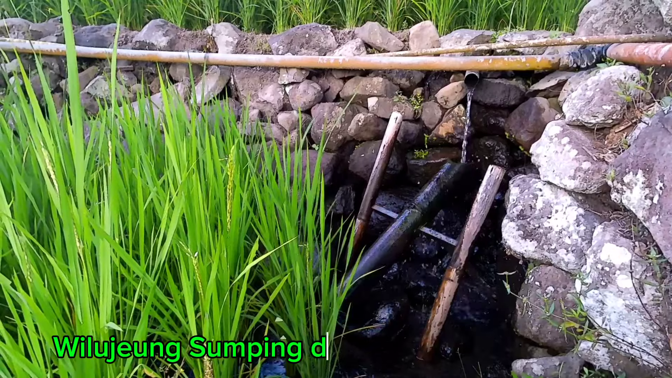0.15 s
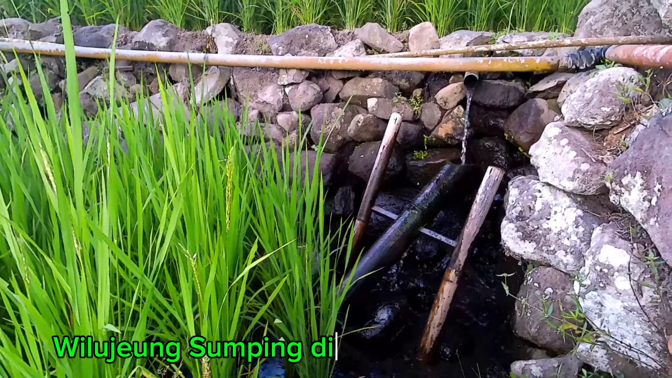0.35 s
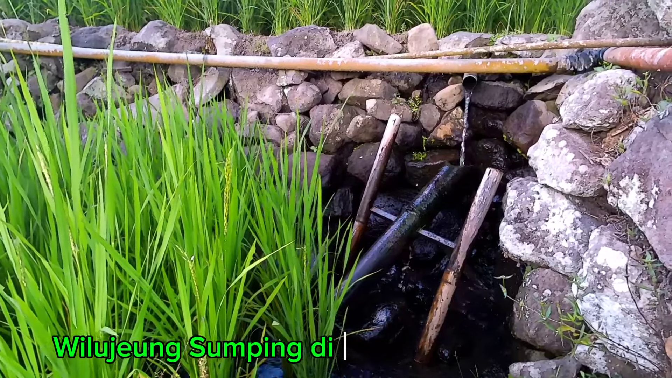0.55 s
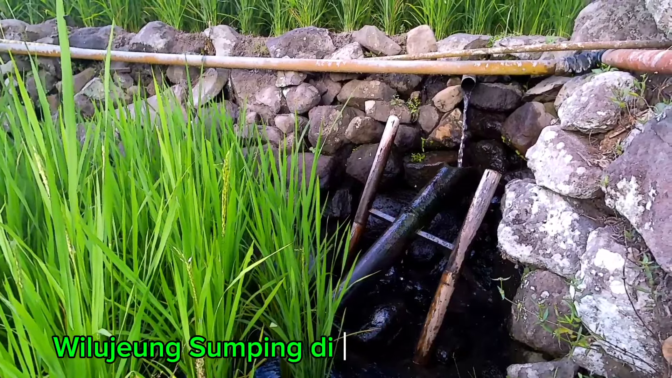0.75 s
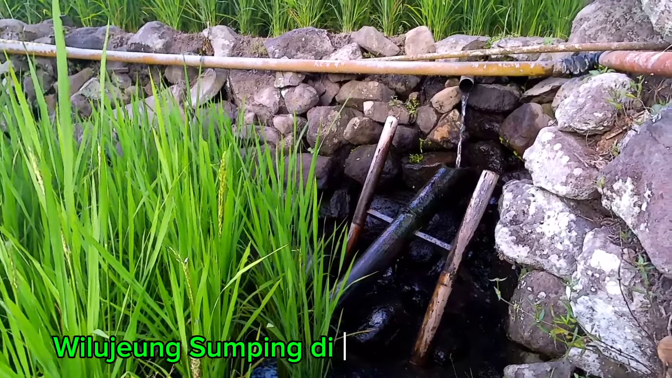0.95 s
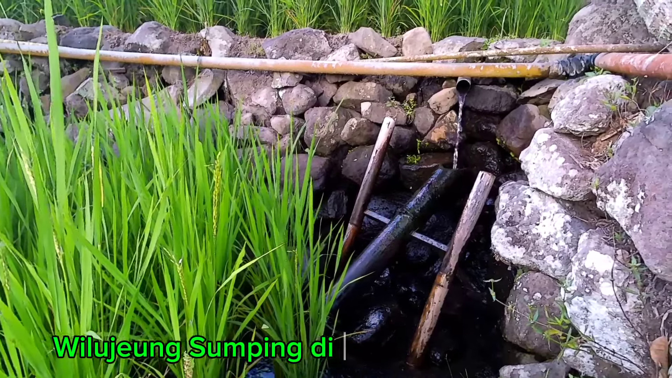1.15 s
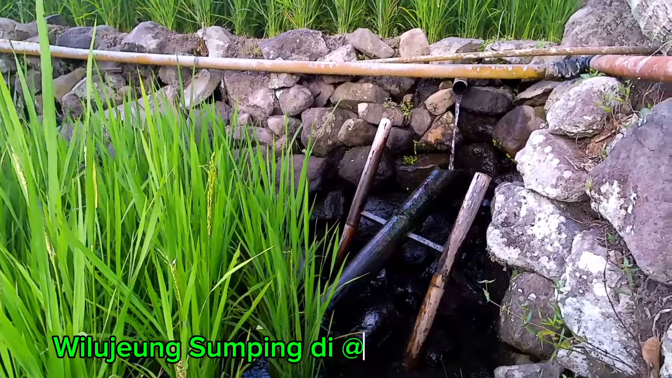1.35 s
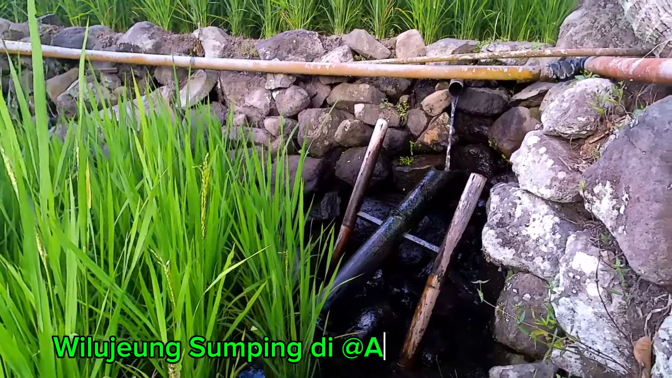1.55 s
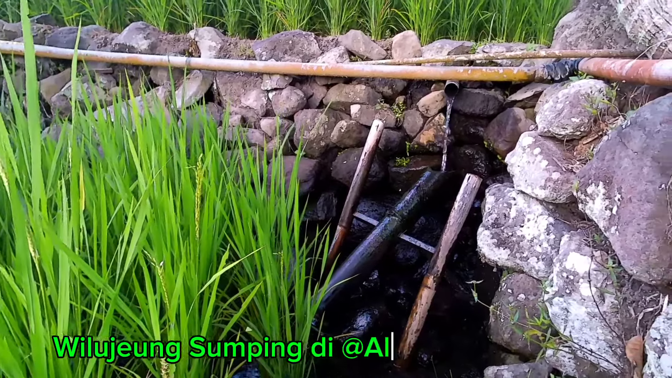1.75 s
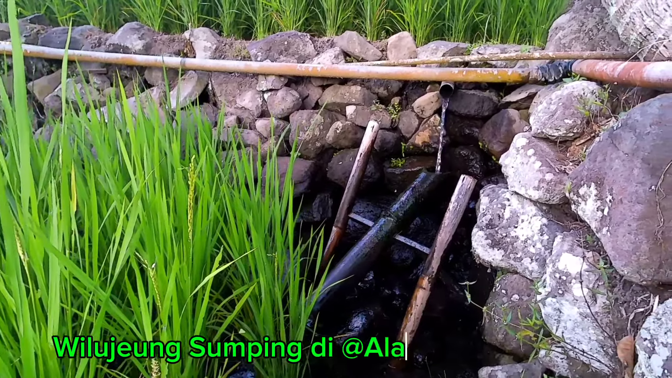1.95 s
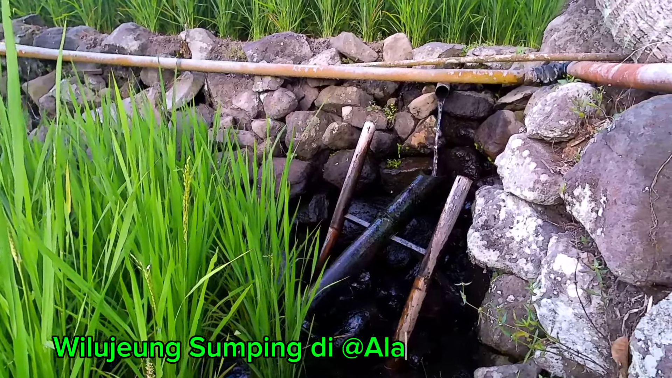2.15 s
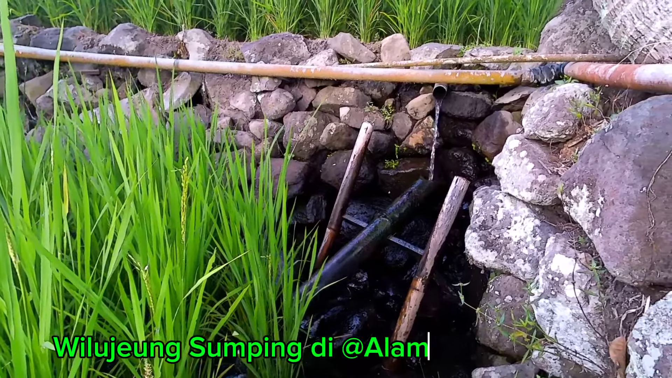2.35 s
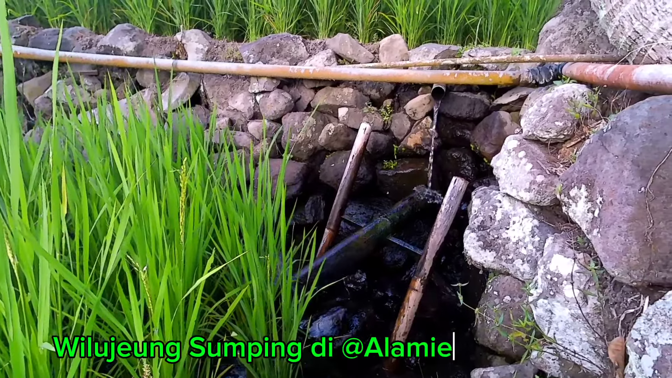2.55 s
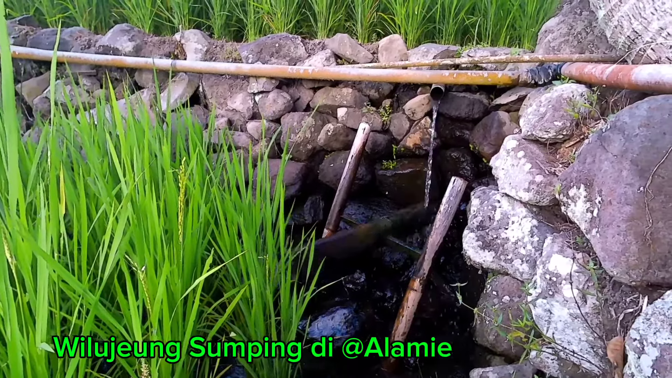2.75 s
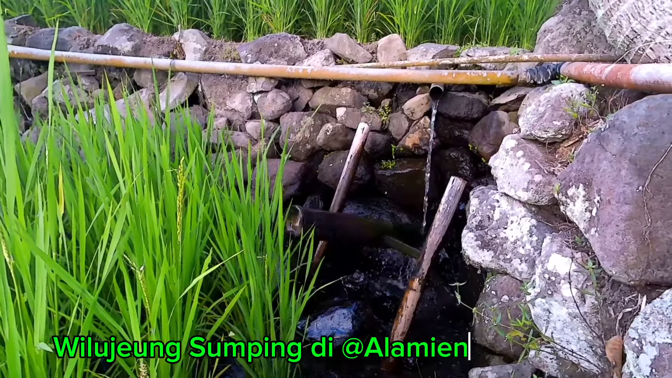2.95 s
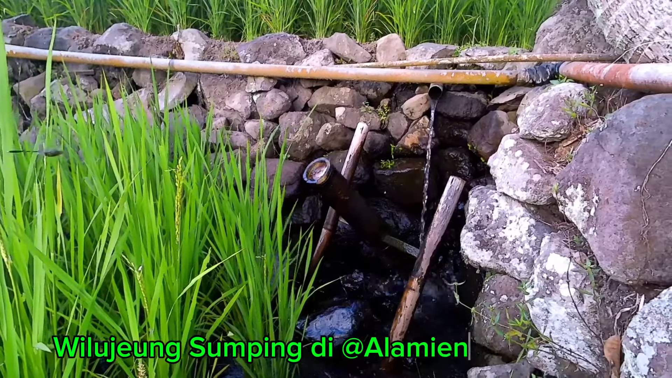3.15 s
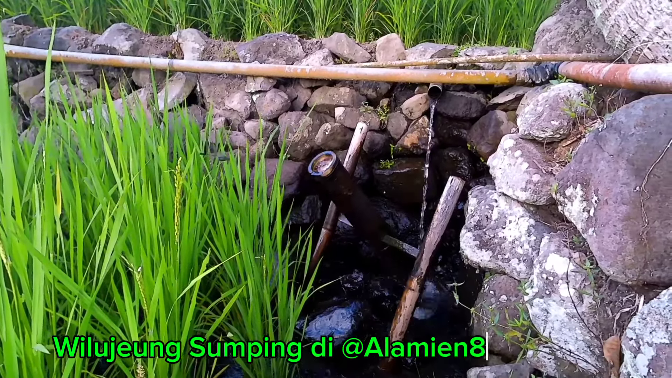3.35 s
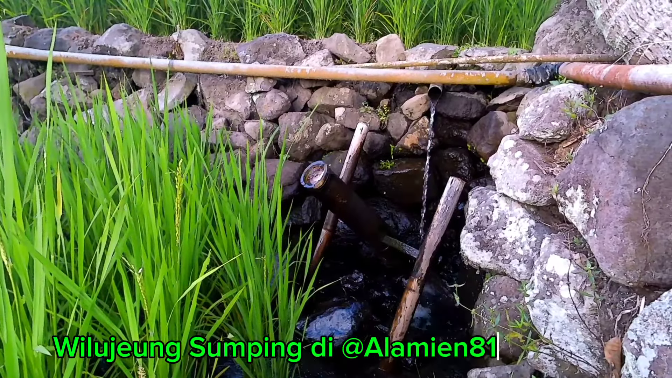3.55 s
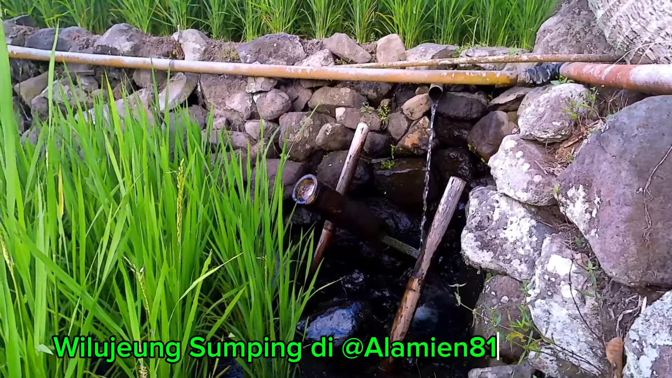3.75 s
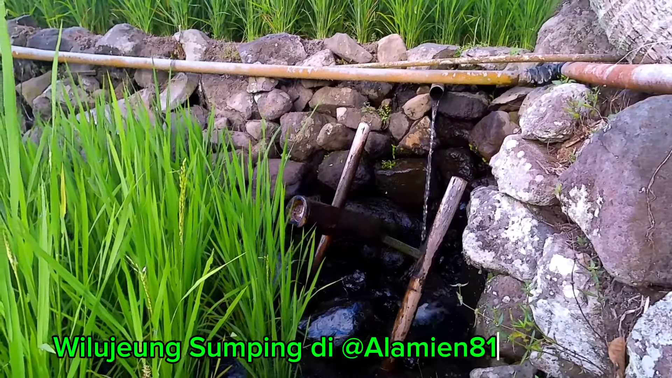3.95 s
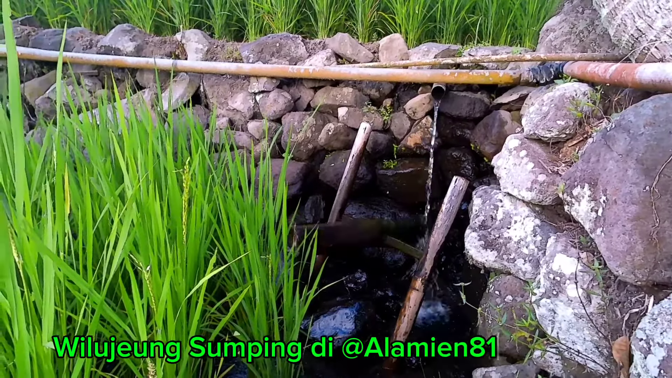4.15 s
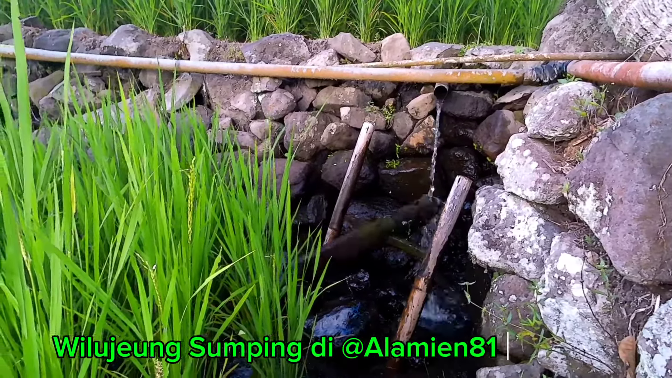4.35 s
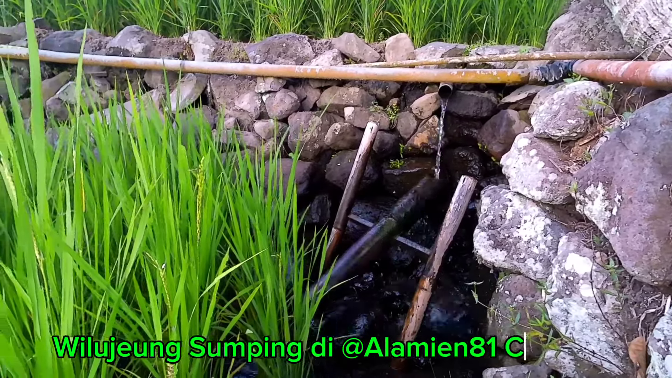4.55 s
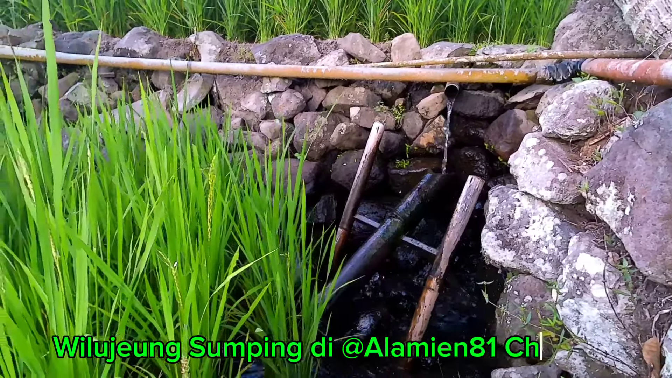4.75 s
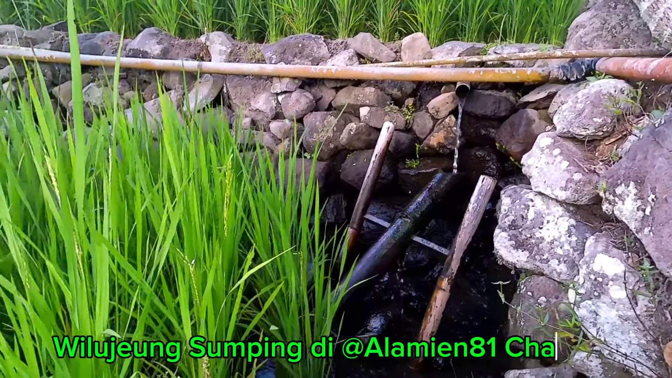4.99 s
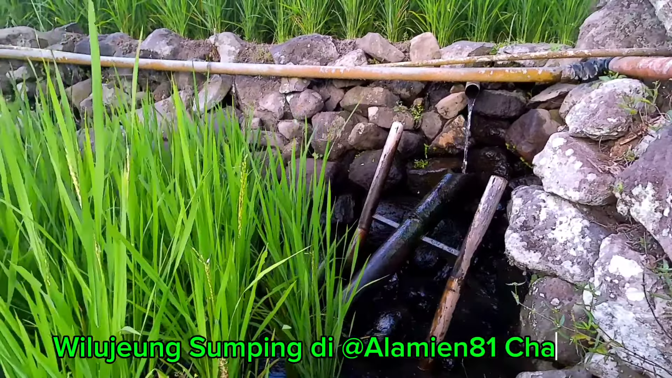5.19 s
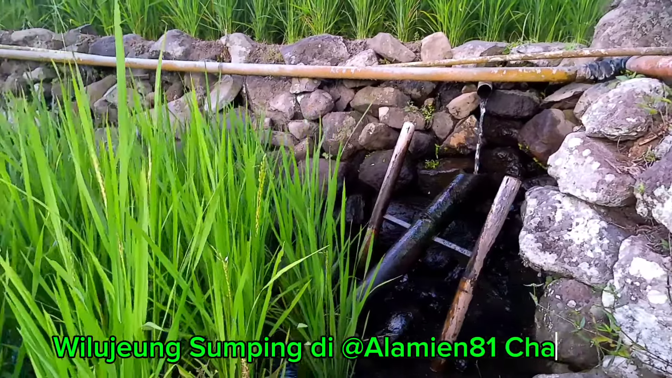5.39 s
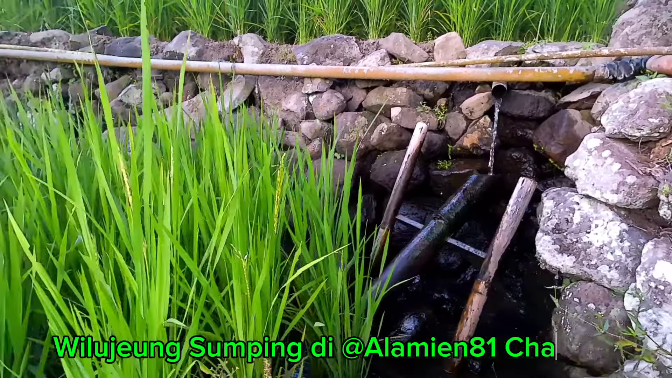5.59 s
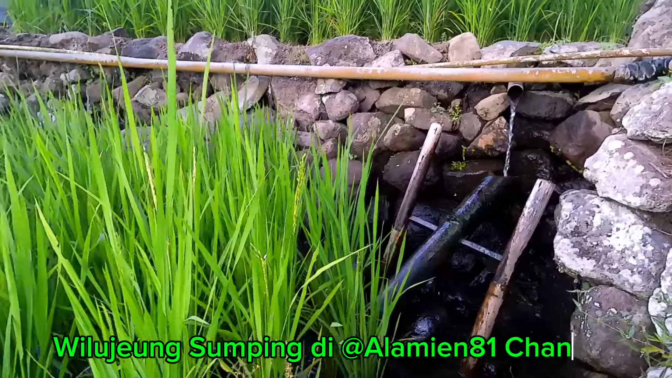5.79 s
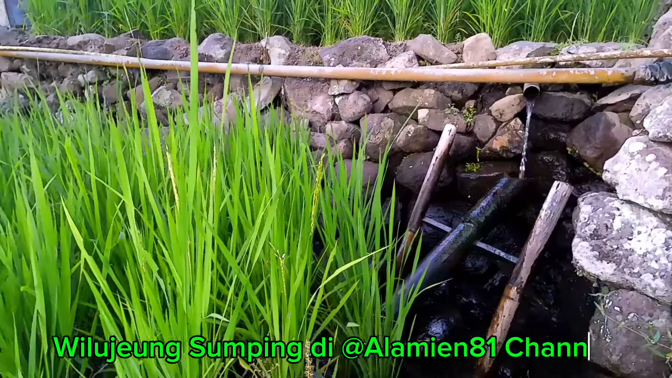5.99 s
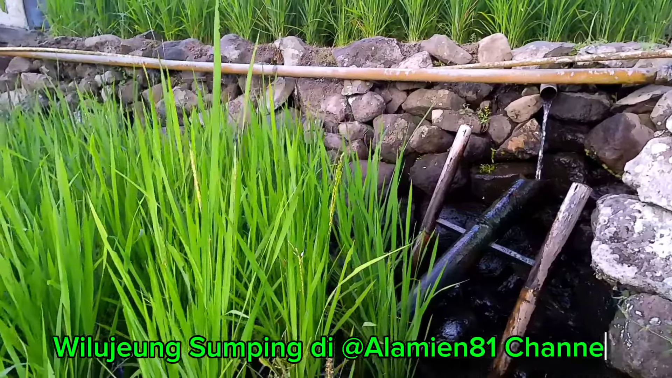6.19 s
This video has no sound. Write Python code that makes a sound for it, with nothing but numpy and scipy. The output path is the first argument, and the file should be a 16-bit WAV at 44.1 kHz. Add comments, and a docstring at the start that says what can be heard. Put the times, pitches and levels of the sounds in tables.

```python
"""A bamboo rocker knocks its closed end on a stone and bounces, in a small stone-walled pool by a rice field.
A thin stream fills the tube; it tips, spills, clacks down on its mouth and swings back to knock again.
Knock and clack are damped modes driven by force pulses, with noise cracks and wall reflections; the knock
is loud enough to overload the microphone. Water trickles and drips throughout as ringing bubbles, over
a faint noise of distant channels."""
import sys
import numpy as np
from scipy import signal
from scipy.io import wavfile

SR = 44100
rng = np.random.default_rng(int(sys.argv[2]) if len(sys.argv) > 2 else 0)


def dump(signal):
    """Clip the signal to [-1, 1] and save it as 16-bit WAV at the path in sys.argv[1]."""
    limited = np.clip(np.atleast_2d(signal).T, -1, 1)
    pcm = np.round(limited * 32767).astype(np.int16)
    wavfile.write(sys.argv[1], SR, pcm)


N = 274743
TIME = np.arange(N) / SR   # s
CUTOFF_HZ = 16290   # upper band limit

# fine spray and droplets on stone: (frequency [Hz], relative density [dB per Hz])
SPRAY_SPECTRUM = [(2500, -6), (3800, 5.5), (5200, -1.5), (6800, -10.5), (9000, -12.5), (10000, -8),
                  (10700, -13)]
# modes of the jolted wooden posts: (frequency [Hz], relative level [dB], t60 [s])
POST_MODES = [(62, -39, .12), (207, -24, .065), (249.1, -27, 0.13), (307, -26.5, 0.025)]
# the closed end falls back on its stone: (time [s], strength [dB])
LANDING_TIMES = [(0.205, 6.5), (4.6655, 6.5)]


def from_db(db):
    """Level to amplitude: 20 dB is a factor of ten."""
    return 10 ** (np.asarray(db) / 20)


def rms_one(x):
    """Normalise the mean power to one."""
    return x / np.sqrt(np.mean(x ** 2) + 1e-20)


def at_hz(points, hz):
    """Interpolate a spectrum in dB along logarithmic frequency."""
    points = np.array(points)
    return np.interp(np.log(hz), np.log(points[:, 0]), points[:, 1])


def dull(x, hz):
    """Second-order low-pass: 12 dB per octave of loss above the corner."""
    sos = signal.butter(2, min(hz, SR / 2 - 1), fs=SR, output="sos")
    return signal.sosfilt(sos, x + 1e-18)


def thin(x, hz, order=2):
    """High-pass: 6 dB per octave and order of loss below the corner."""
    return signal.sosfilt(signal.butter(order, hz, "high", fs=SR, output="sos"), x + 1e-18)


def ring(clicks, hz, t60):
    """Damped resonator: a unit impulse excites a decaying sine of initial height 1."""
    radius = np.exp(-np.log(1000) / (t60 * SR))
    angle = 2 * np.pi * hz / SR
    return signal.lfilter([0, np.sin(angle)], [1, -2 * radius * np.cos(angle), radius ** 2], clicks + 1e-18)


def ring_modes(force, modes):
    """Modal superposition: one force excites every damped mode at its own level."""
    return sum(ring(force, hz, t60) * from_db(db) for hz, db, t60 in modes)


def fade(t, t60):
    """Exponential decay, losing 60 dB in t60."""
    return np.exp(-np.log(1000) * t / t60)


def add(out, s, sound):
    """Linear superposition of a sound from time s on."""
    start = max(round(s * SR), 0)
    out[start:start + len(sound)] += sound[:max(N - start, 0)]


def drift(per_s):
    """Slow random fluctuation: unit-variance Gaussian knots joined by straight lines."""
    knots = rng.standard_normal(1000)
    return np.interp(TIME * per_s, np.arange(len(knots)), knots)


def now_and_then(per_s, count=40):
    """Jittered arrivals: one random moment [s] in each mean period."""
    return (np.arange(count) + rng.random(count)) / per_s


def noise(spectrum, size):
    """Filter-bank shaping: half-octave bands of white noise weighted to a spectrum, rms 1."""
    edges = np.geomspace(20, 18000, 21)
    white = rng.standard_normal((2, size))
    out = 0
    for k, (low, high) in enumerate(zip(edges, edges[1:])):
        sos = signal.butter(2, [low, high], "band", fs=SR, output="sos")
        band = signal.sosfilt(sos, white[k % 2])   # neighbouring bands are independent
        out = out + band * from_db(at_hz(spectrum, np.sqrt(low * high)))
    return rms_one(out)


def bubbles(spectrum, per_s, cycles, spread_db, clump_db, clumps_per_s, count=64):
    """Bubble resonance: clumped impulses of uneven size ring damped tones at many pitches, rms 1."""
    out = 0
    surge = drift(clumps_per_s)   # shared by all pitches
    births = max(int(per_s * N / SR / count), 1)
    pitches = np.geomspace(spectrum[0][0], min(spectrum[-1][0], CUTOFF_HZ), count)
    for k, hz in enumerate(pitches):
        if k % 8 == 0:   # bubbles of like size are born together
            clump = from_db(clump_db * (.5 * surge + drift(clumps_per_s)))
        when, size, sign = rng.random((3, 1000))[:, :births]
        size_db = spread_db * np.minimum(-np.log(1 - size), 3)
        clicks = np.zeros(N)
        clicks[(when * N).astype(int)] = from_db(size_db) * np.sign(sign - .5)
        tone = np.diff(ring(clicks * clump, hz, cycles / hz), prepend=0)
        # sqrt(hz): logarithmically spaced pitches each stand for a band as wide as its frequency
        out = out + rms_one(tone) * from_db(at_hz(spectrum, hz)) * np.sqrt(hz)
    return rms_one(out)


def contacts(blows):
    """Impact force: low-passed impulses, each with its own contact brightness."""
    out = np.zeros(N)
    for s, db, bright_hz in blows:
        add(out, s, from_db(db) * dull(signal.unit_impulse(512), bright_hz))
    return out


def crack(force, t60, build_s):
    """High modal density: fibre modes respond to each contact as a decaying noise burst."""
    # splintery crack: (frequency [Hz], relative density [dB per Hz])
    crack_spectrum = [(40, -31), (130, -15.5), (400, -6.5), (1200, -5), (2500, -5.5), (4000, -12),
                      (5500, -10), (7500, -13), (10500, -18.5), (13000, -34)]
    t = TIME[:SR // 4]
    response = noise(crack_spectrum, size=len(t)) * fade(t, t60) * (1 - np.exp(-t / build_s))
    return signal.fftconvolve(force, response)[:N]


def scatter(x, t60, top_hz, build_s):
    """Diffuse reflection: rough stone walls return a short tail of low-passed, decaying noise."""
    t = TIME[:SR // 2]
    tail = dull(rng.standard_normal(len(t)), top_hz) * fade(t, t60) * (1 - np.exp(-t / build_s))
    tail = tail / np.sqrt(np.sum(tail ** 2) * SR / (2 * top_hz))   # level independent of length and band
    return signal.fftconvolve(x, tail)[:N]


def distant_channels():
    """Broadband flow noise: the faint, steady rush of distant channels."""
    # distant rush: (frequency [Hz], relative density [dB per Hz])
    rush_spectrum = [(25, -3), (60, 1), (130, 0.5), (250, -5), (430, 0.5), (700, -3.5), (1500, -4),
                     (2500, -16), (3500, -22), (5500, -24), (8000, -33), (11000, -29.5), (16000, -31)]
    return from_db(-69.5) * noise(rush_spectrum, size=N)


def ticks(t60=.06):
    """Droplet impact: stray droplets burst on wet stone as decaying high-passed noise."""
    # stray droplets: (time [s], relative level [dB])
    tick_bursts = [(.501, -59.5), (1.038, -62.5), (1.111, -62), (4.464, -58), (4.836, -62)]
    envelope = np.zeros(N)
    for s, db in tick_bursts:
        add(envelope, s, from_db(db) * fade(TIME[:SR // 10], t60))
    return envelope * thin(noise(SPRAY_SPECTRUM, size=N), hz=2000)


def drops(rise=0.027, twin_db=-8, twin_octaves=.2):
    """Trapped-bubble resonance: each drop, gulp or drip and a weaker twin swell, rise in pitch and decay."""
    # the clearest single drops: (time [s], relative level [dB], pitch [Hz])
    single_drops = [(1.16, -45.5, 422), (1.272, -48, 1600), (1.382, -50, 439), (2.021, -46.5, 1097),
                    (2.248, -39.5, 460), (2.697, -46.5, 414), (1.565, -49.5, 941), (3.166, -35, 560),
                    (3.224, -32.5, 1100), (3.54, -41, 1897), (4.267, -44, 2520), (5.037, -34.5, 1850),
                    (5.043, -44.5, 2236), (5.293, -44.5, 887), (5.738, -51, 408)]
    # the pool gulps under the falling stream: (time [s], relative level [dB], pitch [Hz])
    pool_gulps = [(3.597, -39, 304), (3.691, -47.5, 439), (3.776, -47.5, 344), (3.833, -45.5, 347),
                  (3.984, -45.5, 393), (4.080, -50.5, 424)]
    # random drips, into tube and pool: (rate [per s], relative level [dB], pitch [Hz], spread [octaves])
    random_drips = [(4.6, -57.5, 420, 0.14), (2.9, -59.5, 1500, .35)]
    drip_spread_db = 2
    cycles, linger_s = 16, .035   # t60 is this many cycles plus the lingering between the stones
    swell_s = .005

    notes = single_drops + pool_gulps
    for per_s, db, hz, octaves in random_drips:
        for s in now_and_then(per_s):
            drip_db = db + drip_spread_db * rng.normal()
            notes.append((s, drip_db, hz * 2 ** (octaves * rng.normal())))
    twins = []
    for s, db, hz in notes:
        twin_hz = hz * 2 ** (twin_octaves * rng.normal())
        twins.append((s + 0.0055 * rng.random(), db + twin_db, twin_hz))

    out = np.zeros(N)
    t = TIME[:SR // 5]
    swell = 1 - np.exp(-(t / swell_s) ** 2)
    for s, db, hz in notes + twins:
        life = fade(t, cycles / hz + linger_s)
        phase = 2 * np.pi * np.cumsum(hz * (1 + rise * (.5 - life))) / SR
        add(out, s, from_db(db) * life * swell * np.sin(phase))
    return out


def gushes():
    """Transient outflow: linear rise, hold and exponential drain; returns the splash and spray gains."""
    # slop over the lip, water leaving the mouth, its landing in the pool, the rest thrown out by the clack,
    # that rest raining back, the stream falling past the tube, its spatter on the returning tube:
    # (start [s], hold with the rise [s], relative splash level [dB], relative spray level [dB], t60 [s])
    gush_steps = [(2.98, 0.095, -66, -71, .3), (3.054, 0.038, -56.5, -52.5, .5),
                  (3.086, .08, -42.5, -60.5, 0.91), (3.26, 0.12, -46, -59.5, 0.86),
                  (3.515, 0.084, -54, -93, 0.17), (3.709, 0.38, -58, -75.5, 0.82),
                  (4.176, 0.24, -64, -67, .2)]
    attack_s = 0.029
    splash, spray = 0, 0
    for s, hold_s, splash_db, spray_db, t60 in gush_steps:
        flow = np.clip((TIME - s) / attack_s, 0, 1) * fade(np.maximum(TIME - s - hold_s, 0), t60)
        splash = np.hypot(splash, from_db(splash_db) * flow)   # powers add
        spray = np.hypot(spray, from_db(spray_db) * flow)
    return splash, spray


def water():
    """Bubble ensembles: steady trickle, gushing splash and spray, and drops, reflected in the stone hollow."""
    # steady trickle into the tube: (frequency [Hz], relative density [dB per Hz])
    trickle_spectrum = [(200, -14.5), (330, -2.5), (430, 5), (540, -9), (900, 1), (1200, -7.5),
                        (1650, -9.5), (2500, -11.5), (3500, -22.5), (5200, -19.5), (7000, -32.5),
                        (10500, -31.5), (12000, -46.5)]
    # lumpy splash: (frequency [Hz], relative density [dB per Hz])
    splash_spectrum = [(200, -14.5), (450, -2.5), (750, -4.5), (1050, 6.5), (1300, 4), (1950, -1),
                       (2450, -0.5), (3200, -13.5), (4500, -17.5)]
    splash_gain, spray_gain = gushes()
    trickle = bubbles(trickle_spectrum, per_s=400, cycles=32, spread_db=3, clump_db=3, clumps_per_s=14)
    splash = bubbles(splash_spectrum, per_s=2400, cycles=44, spread_db=3, clump_db=3, clumps_per_s=26)
    spray = bubbles(SPRAY_SPECTRUM, per_s=2600, cycles=50, spread_db=3.3, clump_db=2.4, clumps_per_s=26)
    direct = from_db(-68.5) * trickle + splash_gain * splash + spray_gain * spray + ticks()
    stream_tail = scatter(direct, t60=.045, top_hz=9000, build_s=.003)
    stream = from_db(-3.5) * direct + from_db(-5) * stream_tail
    plops = from_db(2.0) * drops()
    plop_tail = scatter(plops, t60=.1, top_hz=4000, build_s=.005)
    return stream + plops + from_db(-7) * plop_tail


def clack():
    """Impact on a wet tube: bright, chattering contacts at the mouth excite short modes and the posts."""
    # graze, strike, chatter and a double-touch rebound: (time [s], strength [dB], contact brightness [Hz])
    mouth_contacts = [(3.2560, -15, 900), (3.2585, -3.5, 5000), (3.2660, -16.5, 1890), (3.3390, -25, 2280),
                      (3.3455, -21, 1680)]
    # wet tube struck at its mouth: (frequency [Hz], relative level [dB], t60 [s])
    mouth_modes = [(193, -10.5, 0.073), (270, -10.5, 0.1324), (300, -13.5, .1), (360.3, -10.5, .15),
                   (405, -21, 0.27), (460, -17, 0.16), (610, -15.5, 0.11), (790, -25.5, .07),
                   (888, -24.5, 0.19), (966, -15.5, .085), (1087, -17, .12), (1222, -14.5, 0.11),
                   (1381, -11.5, 0.08), (1600, -12.5, 0.064), (1826, -27, 0.079), (1935, -1.5, 0.016),
                   (2180, 3, 0.019), (2235, 4, 0.0099), (2310, -22.5, 0.033), (2490, -14, 0.034),
                   (2890, -9, 0.022), (3032, -18, 0.025)]
    force = contacts(mouth_contacts)
    # successive modes alternate in sign
    modes = ring_modes(force, mouth_modes[::2]) - ring_modes(force, mouth_modes[1::2])
    body = thin(from_db(-1.5) * modes, hz=170, order=4)
    body = body + from_db(-12) * crack(force, t60=0.036, build_s=0.0012)
    body = body + from_db(-12.5) * ring_modes(force, POST_MODES)
    return body + from_db(-13) * scatter(body, t60=0.12, top_hz=4374, build_s=0.0056)


def hollow_tube():
    """Air-column resonance: the landing and its bounces excite slowly swelling tube modes and a crack."""
    # graze, blow, first bounce, second bounce and last touch of every landing: (time after the blow [s], level
    # re the landing strength [dB], contact brightness [Hz])
    bounce_steps = [(-.0022, -19, 4650), (0, -0.53, 4000), (0.0707, -23.5, 1400), (0.2423, -25, 900),
                    (.2658, -35.5, 1300)]
    # empty tube, led by its air column: (frequency [Hz], relative level [dB], t60 [s])
    tube_modes = [(420, -.3, .08), (446, -19, .135), (518, -25, .155), (293, -33, .15), (607, -22.3, .077),
                  (723, -31.5, .07), (878, -22.9, .109), (974, -17.6, .058), (1068, -19.5, .096),
                  (1213, -19, .15), (1314, -31, .08), (1661, -30.4, .043), (1757, -29.6, .05),
                  (2060, -36, .06), (2272, -26, .068), (2735, -33.2, .06), (3360, -43, .04)]
    blows = [(s + after_s, db + step_db, bright_hz)
             for s, db in LANDING_TIMES for after_s, step_db, bright_hz in bounce_steps]
    force = contacts(blows)
    swell_s = 0.0028   # t60 of the part subtracted, so that the air column takes a moment to pick up the blow
    swelling = [(hz, db, swell_s) for hz, db, _ in tube_modes]
    body = ring_modes(force, tube_modes) - ring_modes(force, swelling)
    body = body + from_db(-10.5) * crack(force, t60=.036, build_s=.006)
    return thin(body, hz=215, order=4)   # a slim tube radiates little bass


def near_walls(body):
    """Early reflections: delayed copies add to the direct sound, the far ones with their treble absorbed."""
    # paths from the closed end by way of the nearby walls: (delay [s], gain [linear])
    wall_paths = [(0, .78), (.00195, 1), (.00428, .88), (.00965, .55), (.01947, .32), (.02966, .12)]
    far_wall_s, wall_top_hz = .015, 2500
    muffled = signal.sosfiltfilt(signal.butter(1, wall_top_hz, fs=SR, output="sos"), body)
    out = np.zeros(N)
    for delay_s, gain in wall_paths:
        add(out, delay_s, gain * (muffled if delay_s > far_wall_s else body))
    return out


def knock():
    """Structural and air-borne response: the tube booms, the posts thud, the cane buzzes, the walls scatter."""
    boom = near_walls(hollow_tube())
    jolt = contacts([(s, db, 3500) for s, db in LANDING_TIMES])
    thud = ring_modes(jolt, POST_MODES)
    buzz = thin(crack(jolt, t60=.25, build_s=0.0036), hz=3000)
    rattle = from_db(-39.5) * dull(buzz, hz=5000)   # the cane buzzes on its axle
    tail = from_db(-38.5) * scatter(boom, t60=.28, top_hz=5000, build_s=0.013)
    return boom + thud + rattle + tail


def scene():
    """Superposition of distant channels, water and the rocker's two impacts, in one channel."""
    return (distant_channels() + water() + clack() + knock())[None]


def record(dry, treble_leak=0.36, treble_hz=11600):
    """Saturation and band-limiting: loud swings flatten, some lost treble returns, the top octave goes."""
    top, hardness = .78, 2.7   # limiting amplitude, sharpness of the knee
    clipped = dry / (1 + np.abs(dry / top) ** hardness) ** (1 / hardness)
    clipped = clipped + treble_leak * thin(dry - clipped, hz=2340, order=4)
    softened = signal.sosfilt(signal.butter(6, treble_hz, fs=SR, output="sos"), clipped)
    return signal.sosfilt(signal.ellip(10, .1, 80, CUTOFF_HZ, fs=SR, output="sos"), softened)


dry = scene()
out = record(dry)
dump(out)
```